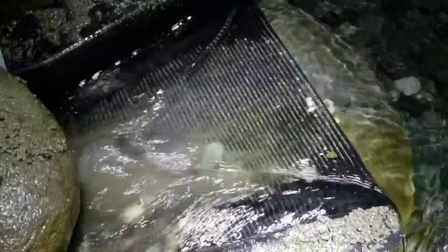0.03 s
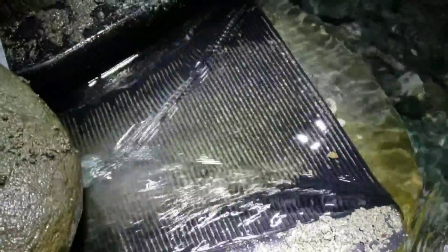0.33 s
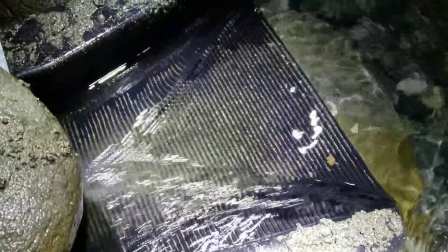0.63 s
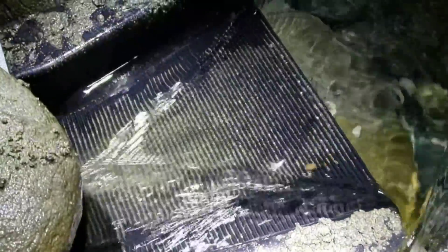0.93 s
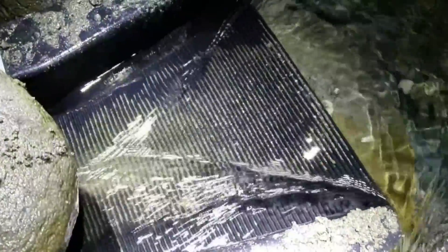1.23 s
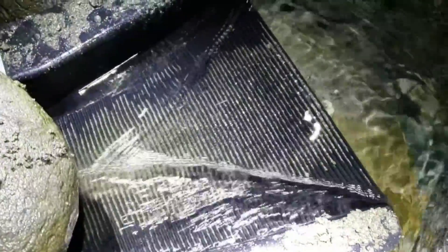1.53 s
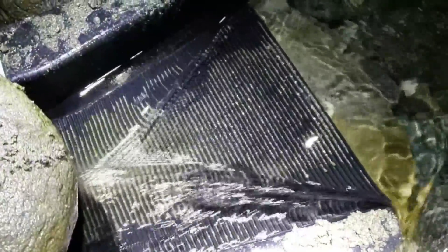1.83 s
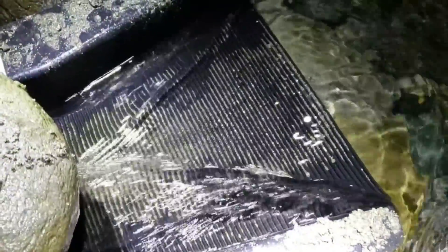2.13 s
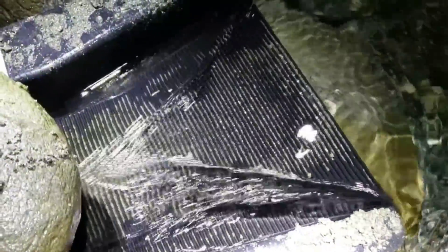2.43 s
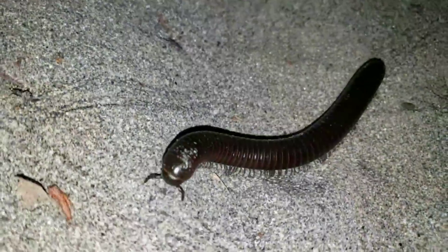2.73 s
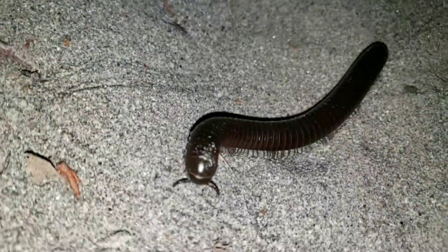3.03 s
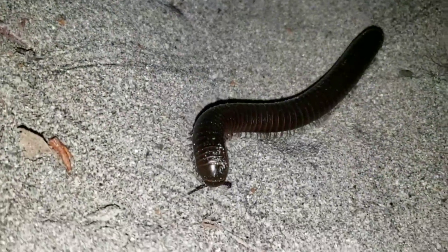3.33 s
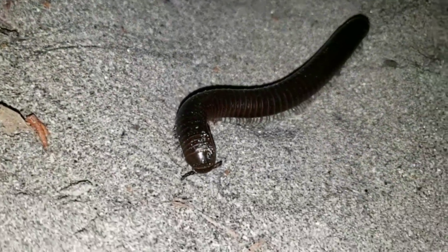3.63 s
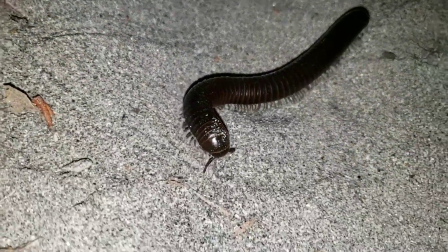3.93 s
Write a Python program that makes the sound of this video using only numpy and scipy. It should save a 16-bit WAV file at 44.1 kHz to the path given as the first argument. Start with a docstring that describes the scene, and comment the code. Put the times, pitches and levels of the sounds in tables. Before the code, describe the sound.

Stream water rushes over a slotted screen between rocks, close up in stereo. For the first 1.2 seconds or so, air pockets gulp and small splashes slap the screen, then it settles into an even rush with fizzing spray and little bubbles. It fades out between 1.8 and 2.5 seconds. At about 2.6 seconds the distant stream cuts in, a quieter, low, steady roar and hiss until the end.

```python
"""Close up, in stereo: a stream pours over a slotted intake screen between rocks.
A surge drains away, air pockets gulping as they close and sheets of water slapping the screen,
and leaves an even rush of spray and small bubbles. The near water fades out.
After a short silence the microphone hears the stream from far off: a low, steady roar and hiss."""
import sys
import numpy as np
from scipy import signal
from scipy.fft import rfft, irfft
from scipy.io import wavfile
from scipy.ndimage import uniform_filter1d

SR = 44100
rng = np.random.default_rng(int(sys.argv[2]) if len(sys.argv) > 2 else 0)


def to_wav(s):
    """Save 16-bit WAV."""
    ch = np.atleast_2d(s).T  # columns
    pcm = np.round(np.clip(ch, -1, 1) * 32767)  # PCM
    wavfile.write(sys.argv[1], SR, pcm.astype(np.int16))


N = 176400

# the stream from far off: f/Hz, relative density/dB
FAR_SPECTRUM = [(20, -39), (35, -18), (65, -2.5), (110, -3.5), (200, .5), (330, -4), (600, -9.5),
                (950, -17), (1450, -16.5), (1900, -18.5), (3700, -17.5), (5500, -20), (7500, -20),
                (9000, -25.5), (12000, -23), (15500, -27.5)]
# rumble of the whole stream, from beside the screen: f/Hz, relative density/dB
RUMBLE_SPECTRUM = [(20, -27), (45, -2), (75, -3.5), (110, -8.5), (200, -8), (600, -34), (15500, -90)]
# even rush, close up: f/Hz, relative density/dB
RUSH_SPECTRUM = [(20, -35), (35, -43), (60, -19), (100, -10), (200, -.5), (300, -1), (620, -1.5),
                 (900, -5.5), (1150, -8), (1700, -10.5), (2300, -10), (4200, -13), (6200, -17.5),
                 (7500, -15), (8900, -21.5), (12500, -19.5), (15500, -22.5)]
# flow over the screen: t/s, gain/dB
FLOW_LEVELS = [(0, 1.5), (.45, 3), (.68, 1.5), (.79, 0.5), (.88, 0.9), (1.0, -0.8), (1.2, -1), (1.55, -2),
               (1.9, -3.5), (2.2, -6)]
# fizzing droplets by pitch: f/Hz, relative level/dB
SPRAY_LEVELS = [(1200, -52), (2500, -40), (4500, -44), (7500, -40.5), (9000, -45.5), (15000, -40.5)]
# slaps on the screen: t/s, level/dB, extra treble/dB, swell time/s
SLAPS = [(0.0213, -13.5, 6.5, 0.0028), (.056, -21, -2, 0.0033), (.099, -21, -5, .002),
         (.110, -27, 0, 0.0011), (.135, -25.5, 4, 0.0036), (0.1492, -13.5, 17, 0.0021),
         (.215, -19.5, -32, 0.0027), (0.249, -28, -16, 0.0013), (0.299, -20, -14, 0.0014),
         (.340, -26, -21, 0.0046), (.419, -25, 4, 0.0073), (0.527, -26, -5, 0.0016),
         (0.622, -18.5, 2, 0.0021), (0.641, -23, -8, 0.0057), (.666, -20.5, -6, 0.0023),
         (.693, -21, -23, 0.0017), (.742, -23.5, 1, 0.0062), (0.804, -25.5, 6, 0.0056),
         (0.848, -17.5, 1.5, .003), (.897, -22, -7, 0.0018), (.927, -26, 6, 0.0038),
         (0.967, -20, 8, 0.0011), (1.043, -19.5, 9, .0012), (1.098, -24.5, 39, 0.0018),
         (1.135, -22, -1, 0.0024), (1.141, -20.5, 3, 0.001), (1.232, -23, 12, 0.002),
         (1.453, -28, 4, 0.0023), (1.657, -28, 0, 0.0033), (2.191, -32, 15, 0.0014)]
# colour of a slap before its extra treble: f/Hz, relative density/dB
SLAP_SPECTRUM = [(100, -32.5), (600, 5), (1500, 0.5), (3500, 2.5), (7500, -4), (9000, -12.5),
                 (15500, -10.5)]
# air pockets that ring as they close: t/s, f/Hz, peak level/dB, swell time/s
AIR_POCKETS = [(.021, 665, -14, 0.0026), (.059, 900, -23, 0.0038), (.151, 823, -17.5, .0025),
               (0.155, 389, -17, 0.0066), (0.193, 417, -25, 0.014), (.197, 870, -18.5, 0.0015),
               (.215, 905, -25, 0.0049), (0.242, 402, -23, 0.012), (.311, 644, -19.5, 0.0034),
               (.344, 923, -26, 0.0066), (.356, 1530, -26.5, 0.0026), (.381, 750, -18.5, 0.0016),
               (.383, 570, -14, 0.0073), (.440, 564, -19.5, 0.0056), (.531, 618, -14, 0.0038),
               (.541, 287, -18.5, .008), (.614, 560, -24.5, 0.0062), (0.632, 948, -18.5, 0.0056),
               (.650, 607, -13, 0.0021), (.695, 947, -15.5, 0.0027), (.697, 555, -13.5, 0.0022),
               (.711, 615, -17.5, 0.0057), (.852, 614, -14.5, 0.0047), (0.8737, 577, -15.5, 0.0023),
               (0.897, 1000, -24.5, .003), (.968, 634, -17.5, 0.0024), (1.023, 900, -23, 0.003),
               (1.068, 2210, -26, 0.0024), (1.217, 576, -23, 0.0053), (1.612, 3770, -30.5, .002),
               (1.741, 2360, -24.5, 0.0019), (2.082, 673, -27, 0.0026), (2.215, 1020, -32.5, 0.0036),
               (2.245, 680, -32, .005)]
# likeness of left and right at the microphone: f/Hz, coherence
COHERENCE = [(60, 1), (130, 0.97), (290, 0.87), (640, 0.45), (1400, -0.17), (3000, 0.023), (15000, -0.045)]
# lean of the water noise to the left: f/Hz, left minus right/dB
BALANCE = [(60, 2), (200, 1), (600, 3), (1300, 0.1), (4000, 0.8), (8000, 3.5), (15000, 0.2)]

GLIDE, GLIDE_S = .08, .014  # pitch rises as a pocket nears the surface
CHURN_DB, CHURN_S, CHURN_OCTAVES = -5, .0093, .64
TREBLE_HZ, ROCK_ECHO_DB, ROCK_T60_S = 7500, -11, .14
FADE_START_S, FADE_END_S, FADE_POWER = 1.827, 2.545, .89
FAR_START_S, FAR_RISE_S = 2.577, .0027
LOW_CUT_HZ, BAND_LIMIT_HZ = 61, 15650


def amp(db):
    """Decibels to gain."""
    return 10 ** (np.asarray(db) / 20)


def unit(x):
    """Scales to rms 1."""
    return x / np.sqrt(np.mean(x ** 2) + 1e-20)


def read(points, hz):
    """Reads a table on a log-frequency axis."""
    f, value = np.transpose(points)
    return np.interp(np.log(hz + 1), np.log(f + 1), value)


def add(mix, s, sound):
    """Mixes a stereo sound in, s seconds from the start."""
    part = mix[:, max(round(s * SR), 0):][:, :sound.shape[1]]
    part += sound[:, :part.shape[1]]


def pan(db):
    """Channel gains that put left db above right."""
    return amp(np.array([[db], [-db]]) / 2)


def swell(t, peak_s):
    """Rises to 1 at peak_s and dies away."""
    return t / peak_s * np.exp(1 - t / peak_s)


def stereo_pair(left, other, hz):
    """Blends two independent noise spectra into partly alike left and right channels."""
    same = read(COHERENCE, hz)
    return np.array([left, same * left + np.sqrt(1 - same ** 2) * other])


def burst(gain, size):
    """Stereo noise of rms 1, coloured by the function gain(Hz)."""
    hz = np.fft.rfftfreq(size, 1 / SR)
    left, other = rfft(rng.standard_normal((2, size)))
    return unit(irfft(stereo_pair(left, other, hz) * gain(hz)))


def wash(spectrum, patch_db, flicker_db=0, size=2048):
    """Water noise with short patches of colour and an optional flicker shared by all pitches."""
    hop = size // 4
    hz = np.fft.rfftfreq(size, 1 / SR)
    a, b, c, d, patches = rng.standard_normal((5, N // hop + 5, len(hz)))
    patches = uniform_filter1d(patches, size=4, axis=0)  # smooth in time
    patches = unit(uniform_filter1d(patches, size=14, axis=1))  # and in frequency
    flicker = unit(uniform_filter1d(rng.standard_normal(len(a)), size=3))[:, None]
    frames = stereo_pair(a + 1j * b, c + 1j * d, hz) * pan(read(BALANCE, hz))
    frames *= amp(read(spectrum, hz) + patch_db * patches + flicker_db * flicker)
    _, noise = signal.istft(frames, nperseg=size, noverlap=size - hop, time_axis=1, freq_axis=2)
    return unit(noise[:, :N])


def bubble_train(hz, cycles, per_s, spread_db):
    """Like bubbles of uneven size ring at random times, from one place in the water."""
    t = np.arange(0, 10 * cycles / hz, 1 / SR)
    chance, strength = rng.random(N), np.minimum(rng.exponential(1, N), 4)
    onsets = (chance < per_s / SR) * amp(spread_db * strength)
    right_shift = rng.uniform(-np.pi, np.pi) * (1 - read(COHERENCE, hz))
    phase = 2 * np.pi * hz * t * (1 + GLIDE * t / t[-1])
    envelope = (1 - np.exp(-2 * t * hz)) * np.exp(-t * hz / cycles)
    ring = envelope * np.sin([phase, phase + right_shift])
    train = signal.oaconvolve(onsets[None], ring, axes=1)[:, :N]
    return unit(train * pan(2 + 3 * rng.standard_normal()))


def far_stream():
    """From far off, the water merges into a low, steady roar and hiss."""
    return amp(-32.5) * wash(FAR_SPECTRUM, patch_db=.95)


def rumble():
    """The whole stream rumbles under the close sounds."""
    return amp(-47.5) * wash(RUMBLE_SPECTRUM, patch_db=2)


def rocks(direct):
    """Adds short scattered echoes from the rocks around the screen."""
    t = np.arange(SR // 8) / SR
    taps = rng.standard_normal((2, len(t))) * (rng.random((2, len(t))) < .05) * (t > .003)
    taps *= amp(-60 * t / ROCK_T60_S)
    taps /= np.linalg.norm(taps, axis=1, keepdims=True)
    return direct + amp(ROCK_ECHO_DB) * signal.oaconvolve(direct, taps, axes=1)[:, :N]


def rush():
    """Water pours evenly over the screen, close to the microphone."""
    return amp(-28) * wash(RUSH_SPECTRUM, patch_db=2, flicker_db=.83, size=1024)


def trickle():
    """Dense fizzing droplets and sparser, lower babbling bubbles."""
    spray = sum(amp(read(SPRAY_LEVELS, hz)) * bubble_train(hz, cycles=2.6, per_s=75, spread_db=4)
                for hz in np.geomspace(1370, 14700, 18))
    babble = sum(bubble_train(hz, cycles=3.9, per_s=7, spread_db=2.5)
                 for hz in np.geomspace(332, 4030, 18))
    return amp(-7.5) * spray + amp(-52) * babble


def splashes():
    """Sheets of water slap the screen, left of centre: bursts of spray a few milliseconds long."""
    out, t = np.zeros((2, N)), np.arange(8192) / SR
    for s, db, treble_db, peak_s in SLAPS:
        spray = burst(lambda f: amp(read(SLAP_SPECTRUM, f)
                                    + treble_db * f ** 4 / (f ** 4 + TREBLE_HZ ** 4)), len(t))
        add(out, s, amp(db) * swell(t, peak_s) * spray)
    return out * pan(4.5)


def gulps():
    """Close up, each air pocket rings with a rising pitch inside a short churn of torn water."""
    out, t = np.zeros((2, N)), np.arange(8192) / SR
    for s, hz, db, peak_s in AIR_POCKETS:
        pitch = hz * (1 + GLIDE * np.tanh((t - 2 * peak_s) / GLIDE_S))
        ring = swell(t, peak_s) * np.sin(2 * np.pi * np.cumsum(pitch) / SR)
        band = burst(lambda f: np.exp(-.5 * (np.log2((f + 1) / hz) / CHURN_OCTAVES) ** 2), len(t))
        churn = swell(t, np.sqrt(CHURN_S * peak_s)) * band / np.sqrt(2)
        add(out, s, amp(db) * (ring + amp(CHURN_DB) * churn))
    return out * pan(2.5)


def scene():
    """The close position fades out, then the distant one cuts in."""
    t = np.arange(N) / SR
    flow = amp(np.interp(t, *np.transpose(FLOW_LEVELS)))
    near = flow * rush() + rocks(flow * trickle() + gulps() + splashes()) + rumble()
    fade_out = np.clip((FADE_END_S - t) / (FADE_END_S - FADE_START_S), 0, 1) ** FADE_POWER
    cut_in = np.clip((t - FAR_START_S) / FAR_RISE_S, 0, 1)
    return near * fade_out + far_stream() * cut_in


def record(dry):
    """The microphone's low cut and the recorder's band limit."""
    low_cut = signal.butter(4, LOW_CUT_HZ, "highpass", fs=SR, output="sos")
    band_limit = signal.firwin(511, BAND_LIMIT_HZ, window=("kaiser", 9), fs=SR)
    return signal.oaconvolve(signal.sosfilt(low_cut, dry), band_limit[None], "same")


dry = scene()
out = record(dry)
to_wav(out)
```